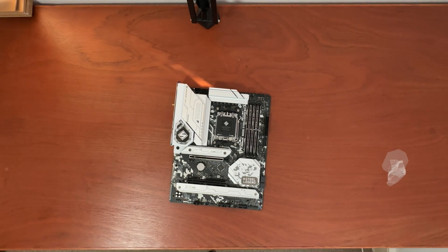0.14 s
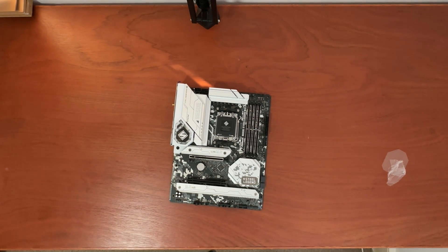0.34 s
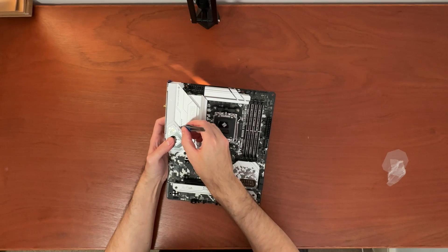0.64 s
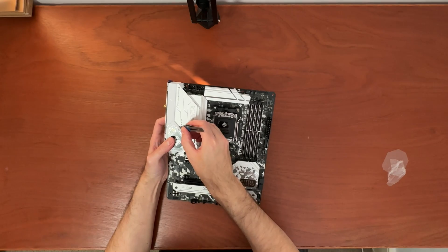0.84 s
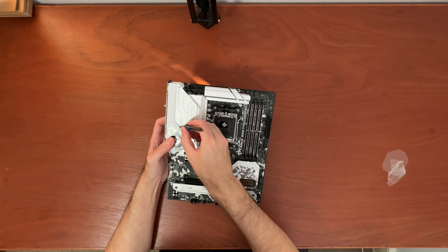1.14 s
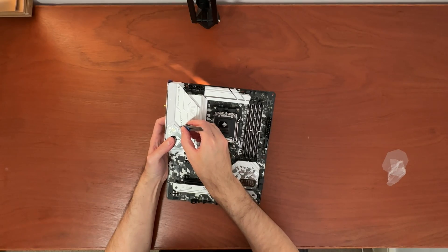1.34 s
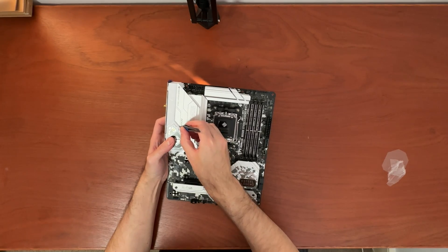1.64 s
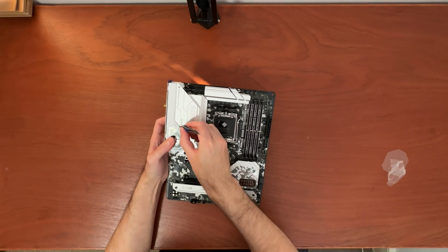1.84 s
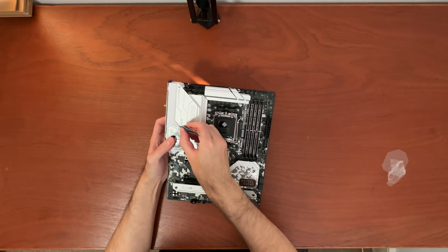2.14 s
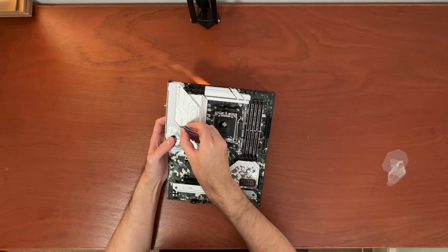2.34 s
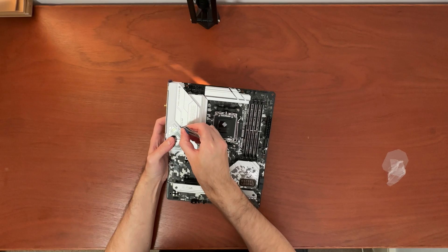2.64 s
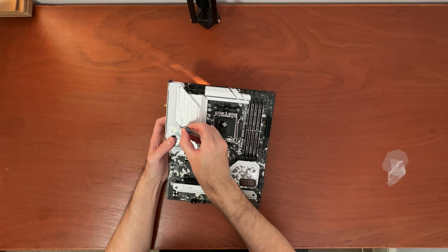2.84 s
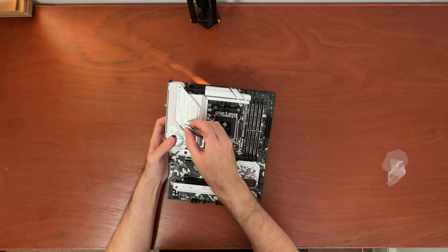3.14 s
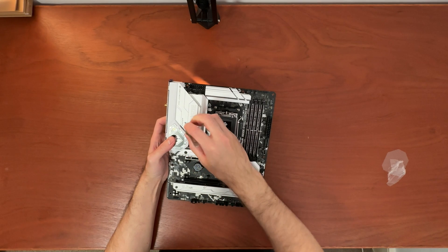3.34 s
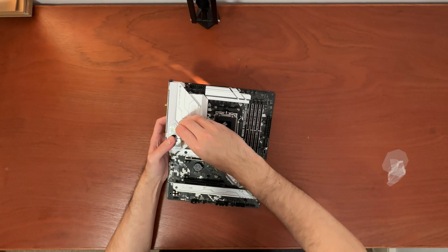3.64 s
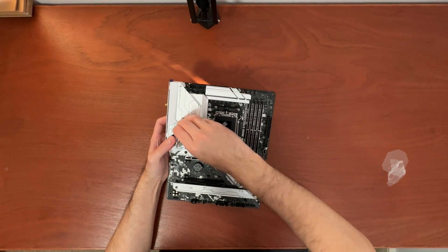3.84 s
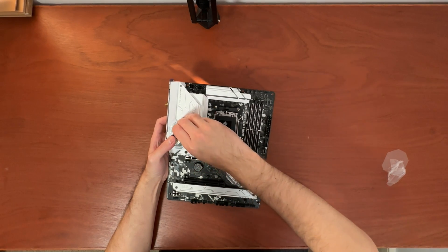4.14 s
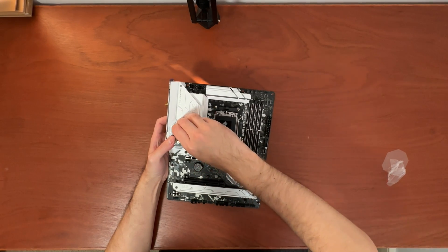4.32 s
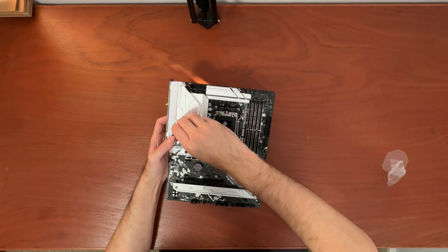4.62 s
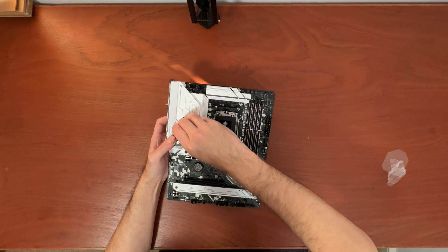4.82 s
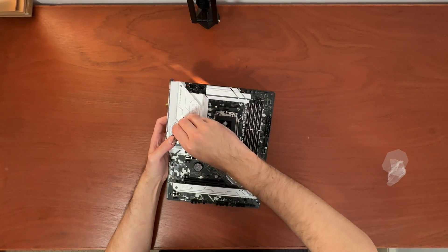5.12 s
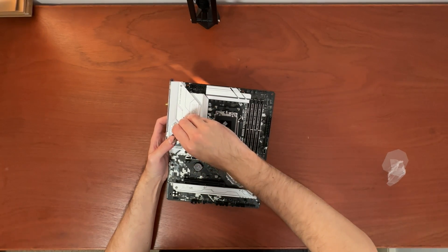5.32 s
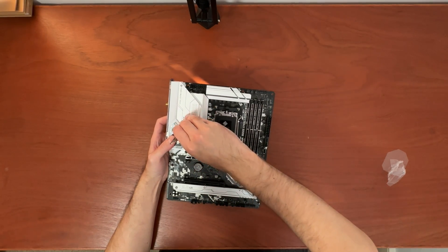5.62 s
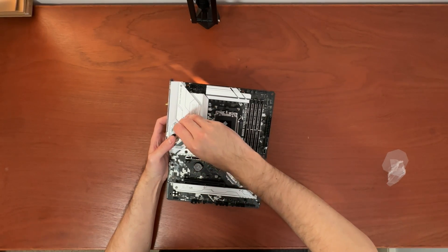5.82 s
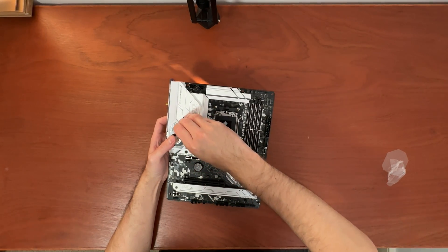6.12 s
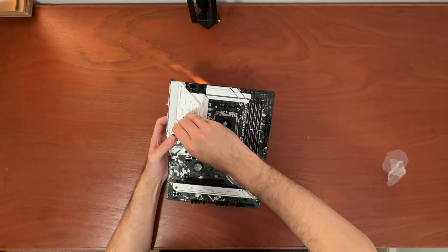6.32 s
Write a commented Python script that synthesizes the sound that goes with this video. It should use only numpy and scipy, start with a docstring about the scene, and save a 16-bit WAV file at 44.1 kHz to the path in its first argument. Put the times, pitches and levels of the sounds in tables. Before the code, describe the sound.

From 0 to 0.45 s hands shift a motherboard on a wooden desk: a low thump at once, then hollow clacks at 0.15 and 0.23 with desk booms, rubbing and rustle, cut off abruptly. At 0.8-1.0 come four faint, bright tweezer ticks. A sharp steel snap falls at 1.9, then a soft finger brush and barely audible scrape at 2.3, and two crisp snaps near 2.5. Fingers rub at 2.6-2.8, leading into a firm, ringing knock at 2.9. Faint brushing and a tiny scrape follow at 3.4-3.6, another brush at 4.0. From 4.4 to 5.05 a run of duller taps includes a clearer scrape at 4.55. A second, softer knock lands at 5.55, with tiny clicks at 5.6 and 5.8 and a last light tap at 6.46. Small dry room, close overhead stereo microphones; constant low rumble and thin hiss, louder left with faint high whistles.

```python
"""Steel tweezers pick at the heatsink cover of a motherboard on a wooden desk: light taps, short scrapes,
sharp snaps as the tips slip off, two firm knocks. Struck modes and brief noise make each contact.
First the board clacks as hands shift it, and later fingers brush it: noise rustles, desk modes boom.
The room is small and dry; its echo is set for two microphones 14 cm apart, about 0.8 m above the board.
Behind it all lie a low room rumble and a thin hiss, with a louder narrow hiss in the left microphone."""
import sys
import numpy as np
from scipy import signal
from scipy.fft import rfft, irfft, next_fast_len
from scipy.io import wavfile
from scipy.ndimage import uniform_filter1d

SR = 44100
rng = np.random.default_rng(int(sys.argv[2]) if len(sys.argv) > 2 else 0)


def master_out(mix):
    """Clip the mix to full scale and print it as 16-bit PCM to the path in sys.argv[1]."""
    frames = np.transpose(np.atleast_2d(mix))
    ceiling = np.clip(frames, -1, 1)
    pcm = np.round(ceiling * 32767).astype(np.int16)
    wavfile.write(sys.argv[1], SR, pcm)


N = 285547
TIME = np.arange(N) / SR
AGE = TIME[:SR // 3]   # time since a contact, s

# Tap, knock and snap-drop levels precede the softening filters; scrape levels follow them.
# t60/s is the time to fade by 60 dB.
# contacts on the cover, opening clacks of the board, then taps of the tips:
# (t/s, build-up/s, cover level/dB, tweezers level/dB)
TAP_EVENTS = [(0.1468, 0.00059, -26, -54), (0.228, 0.00076, -29.5, -53), (0.7983, 0.00019, -46, -34),
              (0.823, 0.00089, -40.5, -40), (0.902, 0.00017, -53, -42), (0.9908, 0.00033, -53, -39),
              (4.423, .0015, -31.5, -37.5), (4.556, 0.0012, -33.5, -58), (4.681, .001, -44, -42.5),
              (4.7981, 0.00073, -42, -43), (4.869, 0.0013, -54, -52), (4.906, 0.0013, -46, -47),
              (5.0501, 0.00085, -39.5, -62), (6.456, 0.0011, -41.5, -40)]
# firm knocks: (main blow t/s, lead of the first tip/s, build-up/s, cover level/dB)
KNOCK_EVENTS = [(2.8895, .0025, .00018, -21), (5.5482, .005, 0.00075, -24.5)]
# tips slipping off an edge and snapping together: (t/s, crack level/dB, ping level/dB, cover level/dB)
SNAP_EVENTS = [(1.9114, -29, -45.5, -43), (2.4573, -27.5, -38.5, -44), (2.513, -24, -56, -34),
               (5.617, -50.5, -70, -51), (5.803, -55, -70, -68)]
# tips dragging over the cover until they let go: (hardest t/s, rise/s, cover level/dB, tweezers level/dB)
SCRAPE_EVENTS = [(2.302, 0.054, -68, -67), (2.867, 0.0072, -58, -46), (3.572, 0.011, -73, -61),
                 (4.556, 0.061, -44.5, -42), (4.685, 0.015, -60.5, -52.5), (4.947, 0.033, -54, -79)]
# fingers brushing the board: (hardest t/s, length/s, rubbing level/dB)
BRUSH_EVENTS = [(2.299, 0.17, -59.5), (2.626, 0.098, -58.5), (2.76, 0.26, -60), (3.383, .3, -64.5),
                (3.581, .09, -57.5), (4.03, 0.088, -59.5)]
# board and hands bumping on the desk: (t/s, level/dB, f/Hz around which the desk is driven)
BUMP_EVENTS = [(0.002, -33, 59.6), (0.169, -36, 65), (0.176, -35, 390), (0.186, -21, 194),
               (0.225, -28.5, 135), (0.293, -36.5, 430), (2.641, -43.5, 60), (5.599, -42, 75.4)]
# hands shifting the board, levels ahead of the trims in handling():
# (hardest t/s, easing/(dB/s), rumble level/dB, rubbing level/dB, rustle level/dB)
PUSH_EVENTS = [(0.003, 190, -31.5, -41.5, -45), (0.175, 77, -34, -37, -48),
               (0.402, 135, -50.5, -51.5, -47.5)]

# heatsink cover, long modes: (f/Hz, relative level/dB, t60/s)
COVER_MODES = [(260.5, -21.5, 0.33), (375.5, -12.5, 0.25), (449, -5.5, 0.24), (540.4, -7.5, 0.34),
               (1075, -2.5, 0.12), (1141.5, 9.5, 0.091), (1192, 1.5, 0.13), (1233, -1, 0.22),
               (1335, -6, 0.22), (1376, 6, 0.15), (1470, -21, 0.28), (1514, -7, 0.15), (1560, -17, 0.061),
               (1540, -17, 0.054), (1739, 3.5, 0.11), (1823, -11, 0.29), (1952, 1.5, 0.07),
               (2310, -14.5, 0.21), (2460, -23, 0.11), (2630, -25, 0.39), (2690, -26, 0.16)]
# the cover's crowd of short-lived modes: (f/Hz, relative level/(dB per Hz))
CLATTER_SPECTRUM = [(120, -21), (260, -13), (400, -8), (650, -8), (930, -27.5), (1130, 4), (1580, 0),
                    (2000, -11.5), (2450, -5), (3800, -21.5), (4800, -9), (5700, -14.5), (6500, -17.5),
                    (10000, -17.5), (16000, -100)]
# board flexing beneath the cover: (f/Hz, relative level/dB, t60/s)
BOARD_MODES = [(400.6, -12.5, 0.16), (760, -2.5, 0.16), (812, -4.5, 0.1)]
# short clink of the tweezer arms, with the cover's longer ring near 1.37 kHz:
# (f/Hz, relative level/dB, t60/s)
CLINK_MODES = [(1368, -2, 0.18), (1910, -17, 0.047), (1893, -3.5, 0.12), (2080, -6, 0.028),
               (2199, 1.5, 0.061), (2260, 1, 0.032), (2943, -3.5, 0.042), (3018, 2, 0.041),
               (3136, -1.5, 0.031), (3764, 1.5, 0.037), (3816, -4, 0.042), (4050, -12, 0.036),
               (10280, -4, 0.046)]
# tweezer tips ringing freely: (f/Hz, relative level/dB, t60/s)
TIP_MODES = [(4290, -1, 0.07), (4360, -6, 0.1), (4410, 0.5, 0.061), (4500, -1, 0.078), (4700, -3, 0.072),
             (4606, 6, 0.11), (5070, 0, .06), (8250, 1, 0.044), (8800, -10, .04), (9280, -6, .045),
             (10640, 5, 0.032)]
# steel on metal: (f/Hz, relative level/(dB per Hz))
CRACK_SPECTRUM = [(300, -17), (1500, -17), (3000, -1), (4500, -1.5), (5700, -10), (9200, 8), (11500, -13),
                  (14500, 13), (15700, -11), (17000, -32)]
# desk top: (f/Hz, relative level/dB, t60/s)
DESK_MODES = [(59, 0.5, .24), (79.8, -1.5, 0.45), (141, 1.5, 0.18), (200.4, -0.5, .22), (293, 3.5, .13),
              (430, -1, 0.14)]
# rumble of the sliding board: (f/Hz, relative level/(dB per Hz))
SHIFT_SPECTRUM = [(15, -20), (35, -10), (65, 5), (130, -6), (250, -28), (600, -75)]
# skin rubbing over the board: (f/Hz, relative level/(dB per Hz))
RUB_SPECTRUM = [(120, 0), (250, -3.5), (450, 1.5), (850, -1), (1300, -9), (2200, -15), (4000, -48),
                (9000, -61)]
# rustle of the hands: (f/Hz, relative level/(dB per Hz))
RUSTLE_SPECTRUM = [(400, -13), (1300, 8.5), (2500, 0), (4500, 1), (7000, -1.5), (9500, -5), (11500, -39),
                   (14500, -11), (17000, -40)]

# the room along its three axes: (length/m, board position/m, left microphone/m, right microphone/m)
ROOM_PLAN_M = [(4.1, 1.9, 1.83, 1.97), (3.2, .62, .5, .5), (2.6, .78, 1.6, 1.6)]
# fading of the room's echo: (f/Hz, t60/s)
ECHO_T60 = [(200, 0.23), (1500, 0.17), (3000, 0.19), (5000, 0.26), (10000, 0.18), (16000, 0.083)]
# room rumble: (f/Hz, relative level/(dB per Hz))
ROOM_TONE_SPECTRUM = [(15, -24), (32, -8.5), (52, -2), (72, 0.5), (100, -5.5), (122, -14), (150, -8.5),
                      (200, -15), (330, -17), (700, -22), (1400, -25.5), (3000, -31.5), (8000, -38),
                      (16000, -93.5)]
# likeness of the rumble in the two microphones: (f/Hz, correlation from -1 to 1)
ROOM_TONE_LIKENESS = [(60, 0.81), (100, 0.55), (170, 0), (400, 0.019), (16000, 0)]
# narrow hiss of the left microphone: (f/Hz, relative level/(dB per Hz))
LEFT_HISS_SPECTRUM = [(1000, -8.5), (3000, -13), (4500, -12.5), (5800, -5.5), (6500, -1), (7150, 4.5),
                      (7900, -2), (8600, -8.5), (9600, -24.5), (11500, -73), (16500, -32)]
# faint whistles in that hiss: (f/Hz, peak level/dB)
LEFT_WHISTLES = [(7017, -68), (7137, -65.5), (7317, -79)]
# thin top hiss of both microphones: (f/Hz, relative level/(dB per Hz))
TOP_HISS_SPECTRUM = [(7000, -2), (9900, 13), (11500, -39), (12900, 14), (14300, 5), (15300, -3),
                     (17000, -24)]

# a soft contact is duller, flexes the board more and ticks less:
# values at the usual build-up, and change per doubling of it
USUAL_BUILD_S = 0.001
BRIGHT_HZ, DULLING_OCTAVES = 1350, 0.58
BOARD_DB, BOARD_RISE_DB = -10.5, 1.5   # relative to the cover
TICK_DB, TICK_LOSS_DB = -30, 3.5
COVER_SPAN_OCTAVES = 2.7   # how far below its brightness a contact drives the cover
ARMS_ABOVE_OCTAVES = 1.5   # the tweezers stay brighter than the cover
# a knock's first tip and one bounce relative to its main blow; tweezers and desk boom relative to the cover
FIRST_TIP_DB, BOUNCE_S, BOUNCE_DB = -5, 0.019, -14
KNOCK_ARMS_DB, KNOCK_BOOM_DB, KNOCK_BOOM_HZ = -19, -21, 95
SNAP_BUILD_S, SNAP_ARMS_DB = 0.00077, -21   # the drop onto the cover; tweezers relative to it
SCRAPE_RELEASE_S, SCRAPE_BOARD_DB = 0.026, -3   # board relative to the cover
SCRAPE_BRIGHT_HZ, SCRAPE_ARMS_HZ = 1400, 2200   # where the treble of cover and tweezers falls off
SLIPS_PER_S = 1500
BRUSH_RISE_SHARE, BRUSH_RUSTLE_DB = 0.44, -8.5   # share of the length spent swelling; rustle re rubbing
BUMP_OCTAVES, BUMP_BUILD_S = 0.27, 0.00093   # width of the drive; its onset
PUSH_RISE_DB_PER_S = 201
RUSTLE_BREAKS_OFF_S = 0.446   # the handling noise breaks off abruptly
RUB_TRIM_DB, RUSTLE_TRIM_DB = 1.0, 4.0
SOUND_M_PER_S, SCATTER_AFTER_S = 343, 0.016
TOUCH_ECHO_DB, SNAP_ECHO_DB = -2.0, -2.5   # echo relative to the sound sent into the room
ROOM_TONE_DB, LEFT_HISS_DB, TOP_HISS_DB = -56, -54.5, -77.5
BASS_LOSS_HZ, CUTOFF_HZ = 36, 16400


def contacts():
    """A board clack or a tap is one contact; in a knock two tips land in turn and bounce once."""
    out = np.zeros((2, N))
    for s, build_s, cover_db, tweezers_db in TAP_EVENTS:
        add(out, s, contact(build_s, cover_db, tweezers_db))
    for s, lead_s, build_s, cover_db in KNOCK_EVENTS:
        blows = [(-lead_s, FIRST_TIP_DB), (0, 0), (BOUNCE_S, BOUNCE_DB)]
        for after_s, step_db in blows:
            blow = contact(build_s, cover_db, cover_db + KNOCK_ARMS_DB)
            add(out, s + after_s, from_db(step_db) * blow)
    return out


def contact(build_s, cover_db, tweezers_db):
    """One contact rings the cover, the board and the tweezers; its softness sets the colour."""
    softness = np.log2(build_s / USUAL_BUILD_S)
    bright_hz = BRIGHT_HZ * 2 ** (-DULLING_OCTAVES * softness)
    cover = thinned(cover_blow(bright_hz), bright_hz / 2 ** COVER_SPAN_OCTAVES)
    arms = dulled(tweezers_blow(), bright_hz * 2 ** ARMS_ABOVE_OCTAVES)
    board_level = from_db(cover_db + BOARD_DB + BOARD_RISE_DB * softness)
    bodies = from_db(cover_db) * cover + board_level * board_blow() + from_db(tweezers_db) * arms
    tick_level = (from_db(cover_db) + from_db(tweezers_db)) * from_db(TICK_DB - TICK_LOSS_DB * softness)
    return bodies * onset(build_s) + tick_level * crack()


def cover_blow(bright_hz):
    """Long modes over a brief clatter; a softer contact leaves out the treble."""
    clatter_decay = fade(0.022) + from_db(-13) * fade(0.11)
    clatter = noise(CLATTER_SPECTRUM, size=len(AGE), likeness=0.53) * clatter_decay
    modes = ring(COVER_MODES, vary_db=1.5, spread=0.7)
    blow = from_db(-4.5) * modes + from_db(2.5) * clatter
    keep = np.exp(-2 * np.pi * bright_hz / SR)   # one-pole lowpass
    return signal.lfilter([1 - keep], [1, -keep], blow)


def board_blow():
    """The heavier board takes a moment to start swinging."""
    return ring(BOARD_MODES, vary_db=2.0, spread=1.0) * onset(0.0036)


def tweezers_blow():
    """The arms give a short clink, with the cover's longer ring near 1.37 kHz in it."""
    return ring(CLINK_MODES, vary_db=3.5, spread=0.76)


def crack():
    """A few milliseconds of bright chatter of steel on metal."""
    return noise(CRACK_SPECTRUM, size=len(AGE), likeness=0.13) * fade(0.021) * onset(0.00013)


def snaps():
    """The tips crack together, ring on and drop onto the cover."""
    out = np.zeros((2, N))
    for s, crack_db, ping_db, cover_db in SNAP_EVENTS:
        ping = ring(TIP_MODES, vary_db=1.5, spread=0.5)
        drop = contact(SNAP_BUILD_S, cover_db, cover_db + SNAP_ARMS_DB)
        add(out, s, from_db(crack_db) * crack() + from_db(ping_db) * ping + drop)
    return out


def scrapes():
    """Dragged tips keep cover, board and tweezers ringing, harder and harder until they let go."""
    out = np.zeros((2, N))
    for s, rise_s, cover_db, tweezers_db in SCRAPE_EVENTS:
        cover = dragged(cover_blow(SCRAPE_BRIGHT_HZ))
        board = dragged(board_blow())
        arms = dragged(dulled(tweezers_blow(), SCRAPE_ARMS_HZ))
        cover_and_board = cover + from_db(SCRAPE_BOARD_DB) * board
        bodies = from_db(cover_db) * cover_and_board + from_db(tweezers_db) * arms
        add(out, s - rise_s, swell(rise_s, SCRAPE_RELEASE_S) * bodies)
    return out


def dragged(body):
    """A stream of tiny random slips keeps a body ringing at an even level of 1."""
    size = 2 * len(AGE)
    slips = (rng.random(size) < SLIPS_PER_S / SR) * rng.standard_normal(size)
    # keep the second half, where the ringing has already built up
    sound = signal.fftconvolve(slips[None], body, axes=1)[:, len(AGE):size]
    power = uniform_filter1d(np.mean(sound ** 2, axis=0), size=SR // 70)
    return sound / np.sqrt(power + 1e-20)


def swell(rise_s, fall_s):
    """Pressure of a stroke, from its start: straight up, straight down."""
    return np.interp(AGE, [0, rise_s, rise_s + fall_s], [0, 1, 0])


def brushes():
    """Finger tips only rub and rustle: noise under a swell of pressure."""
    out = np.zeros((2, N))
    for s, length_s, rubbing_db in BRUSH_EVENTS:
        rise_s = BRUSH_RISE_SHARE * length_s
        rubbing = noise(RUB_SPECTRUM, size=len(AGE))
        rustle = noise(RUSTLE_SPECTRUM, size=len(AGE))
        skin = rubbing + from_db(BRUSH_RUSTLE_DB) * rustle
        add(out, s - rise_s, from_db(rubbing_db) * swell(rise_s, length_s - rise_s) * skin)
    return out


def bumps():
    """The desk top booms briefly under the board and each knock, in the modes nearest the drive."""
    out = np.zeros((2, N))
    hz, mode_db, t60 = np.transpose(DESK_MODES)[:, :, None]
    modes = from_db(mode_db) * np.sin(2 * np.pi * hz * AGE) * fade(t60) * onset(BUMP_BUILD_S)
    under_knocks = [(s, cover_db + KNOCK_BOOM_DB, KNOCK_BOOM_HZ) for s, _, _, cover_db in KNOCK_EVENTS]
    for s, level_db, drive_hz in [*BUMP_EVENTS, *under_knocks]:
        share = np.exp(-np.abs(np.log2(hz / drive_hz)) / BUMP_OCTAVES)
        boom = np.sum(share * modes, axis=0) / np.linalg.norm(share)
        add(out, s, from_db(level_db) * boom * pan(0.3))
    return out


def handling():
    """The board slides and skin rubs over it; each push swells and eases, then the noise breaks off."""
    levels = np.zeros((3, N))
    for s, easing, *levels_db in PUSH_EVENTS:
        drop_db = np.maximum(PUSH_RISE_DB_PER_S * (s - TIME), easing * (TIME - s))
        levels += from_db(np.array(levels_db)[:, None] - drop_db)
    rumble, rubbing, rustling = levels
    shift = rumble * noise(SHIFT_SPECTRUM, size=N, likeness=0.97)
    rub = rubbing * from_db(RUB_TRIM_DB) * noise(RUB_SPECTRUM, size=N, likeness=0.1) * pan(1.4)
    rustle = rustling * from_db(RUSTLE_TRIM_DB) * noise(RUSTLE_SPECTRUM, size=N, likeness=0.05) * pan(4.1)
    break_off = np.clip((RUSTLE_BREAKS_OFF_S - TIME) / 0.0018, 0, 1)
    return (shift + rub + rustle) * break_off


def room(x):
    """Wall reflections of unit energy, each band of the echo fading at its own rate."""
    hz = np.arange(len(AGE) // 2 + 1) * SR / len(AGE)
    clicks = rfft([reflections(channel=c, order=24) for c in range(2)])
    known_hz, t60s = np.transpose(ECHO_T60)
    echo = np.zeros((2, len(AGE)))
    for one_band, t60 in zip(np.eye(len(t60s)), t60s):
        band = at_hz(np.column_stack([known_hz, one_band]), hz)   # overlaps its neighbours
        echo += irfft(clicks * band, len(AGE)) * fade(t60)
    return signal.fftconvolve(x, rms_one(echo) / np.sqrt(len(AGE)), axes=1)[:, :N]


def reflections(channel, order):
    """One click for each mirror image of the board in the walls, timed from the direct sound."""
    k = np.arange(-order, order + 1)
    offsets = []
    for length, board, *mics in ROOM_PLAN_M:
        image = k * length + np.where(k % 2, length - board, board)
        offsets.append(image - mics[channel])
    x, y, z = np.ix_(*offsets)
    metres = np.sqrt(x ** 2 + y ** 2 + z ** 2).ravel()
    delay = np.round((metres - metres.min()) / SOUND_M_PER_S * SR).astype(int)
    # the first reflections alternate in sign; furniture scatters the later ones
    alternating = 1 - 2 * (np.arange(len(metres)) % 2)
    scattered = rng.choice([-1, 1], len(metres))
    sign = np.where(delay < SCATTER_AFTER_S * SR, alternating, scattered)
    strength = (delay > 0) * sign / metres   # leaves out the direct sound
    return np.bincount(delay, strength, minlength=len(AGE))[:len(AGE)]


def background():
    """Room rumble and a thin hiss on both sides; the left microphone hisses louder and whistles faintly."""
    tone = noise(ROOM_TONE_SPECTRUM, size=N, likeness=ROOM_TONE_LIKENESS) * pan(0.46)
    top = noise(TOP_HISS_SPECTRUM, size=N, likeness=0.14)
    left = from_db(LEFT_HISS_DB) * noise(LEFT_HISS_SPECTRUM, size=N)[0]
    for hz, level_db in LEFT_WHISTLES:
        left += from_db(level_db) * np.sin(2 * np.pi * hz * TIME)
    left_only = left * np.array([[1], [0]])
    return from_db(ROOM_TONE_DB) * tone + from_db(TOP_HISS_DB) * top + left_only


def ring(modes, vary_db, spread):
    """Struck modes at a nominal rms of 1; strength varies by blow, phase differs between microphones."""
    hz, level_db, t60 = np.transpose(modes)[:, :, None]
    strength, skew = rng.standard_normal((2, len(modes), 1))
    gain = from_db(level_db + vary_db * strength)
    sign = (-1) ** np.arange(len(modes))[:, None]
    swing = sign * gain * fade(t60)
    waves = [swing * np.sin(2 * np.pi * hz * AGE + side * spread * skew) for side in (1, -1)]
    return np.sum(waves, axis=1) / np.sqrt(np.sum(gain ** 2) / 2)


def noise(spectrum, size, likeness=0):
    """Coloured stereo noise of rms 1; likeness, one value or a table, is the channels' correlation."""
    padded = next_fast_len(size)
    hz = np.arange(padded // 2 + 1) * SR / padded
    alike = likeness if np.isscalar(likeness) else at_hz(likeness, hz)
    alike = np.clip(alike, -1, 1)
    mid, side = rfft(rng.standard_normal((2, padded)))
    both = np.sqrt(1 + alike) * mid + np.sqrt(1 - alike) * side * [[1], [-1]]
    coloured = irfft(both * from_db(at_hz(spectrum, hz)), padded)
    return rms_one(coloured[:, :size])


def fade(t60):
    """Exponential decay by 60 dB in t60 seconds."""
    return from_db(-60 * AGE / t60)


def onset(build_s):
    """Exponential approach to full level with the given time constant."""
    return 1 - np.exp(-AGE / build_s)


def dulled(x, hz):
    """Takes off the treble above a pitch."""
    corner_hz = np.clip(hz, 100, 0.45 * SR)
    return signal.sosfilt(signal.butter(2, corner_hz, fs=SR, output="sos"), x)


def thinned(x, hz):
    """Takes off the bass below a pitch."""
    corner_hz = np.clip(hz, 20, 0.45 * SR)
    return signal.sosfilt(signal.butter(2, corner_hz, "high", fs=SR, output="sos"), x)


def at_hz(points, hz):
    """Reads a table along a logarithmic frequency axis."""
    known_hz, values = np.transpose(points)
    return np.interp(np.log(hz + 1e-9), np.log(known_hz), values)


def from_db(db):
    """Amplitude factor of a level in dB."""
    return 10 ** (np.asarray(db) / 20)


def rms_one(x):
    """Scales a signal to rms 1 over both channels."""
    return x / np.sqrt(np.mean(x ** 2) + 1e-20)


def pan(left_db):
    """Gains that make the left channel louder than the right by left_db."""
    return from_db(np.array([[left_db], [-left_db]]) / 2)


def add(out, s, sound):
    """Mixes a sound in at a given time."""
    start = max(round(s * SR), 0)
    out[:, start:start + sound.shape[1]] += sound[:, :N - start]


def scene():
    """Touches and snaps excite the room; bumps, handling and background are added without echo."""
    touches = contacts() + scrapes() + brushes()
    clicks = snaps()
    echo = room(from_db(TOUCH_ECHO_DB) * touches + from_db(SNAP_ECHO_DB) * clicks)
    return touches + clicks + echo + bumps() + handling() + background()


def record(dry):
    """The microphones lose the deepest bass; the top is cut steeply."""
    thin = thinned(dry, BASS_LOSS_HZ)
    steep = signal.ellip(10, 0.1, 80, CUTOFF_HZ, fs=SR, output="sos")   # 0.1 dB ripple, 80 dB stop
    return signal.sosfilt(steep, thin)


dry = scene()
out = record(dry)
master_out(out)
```